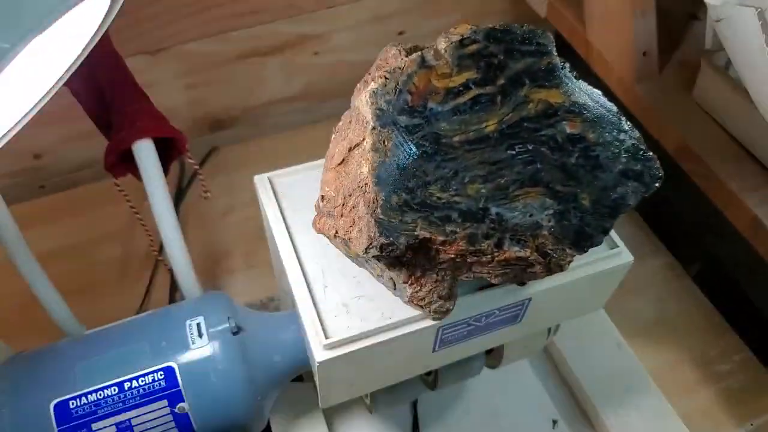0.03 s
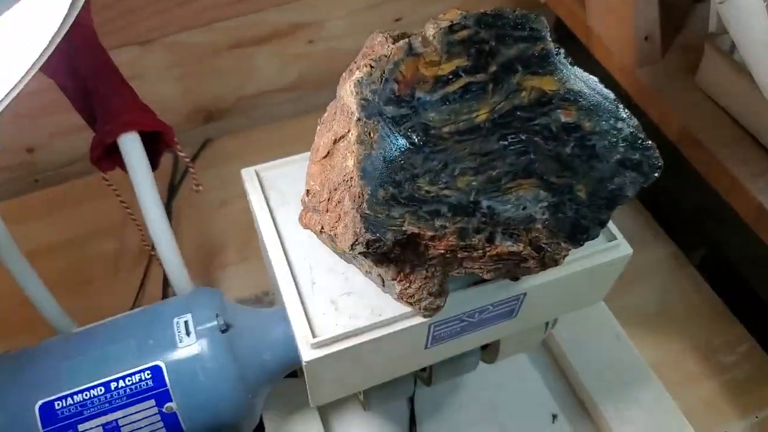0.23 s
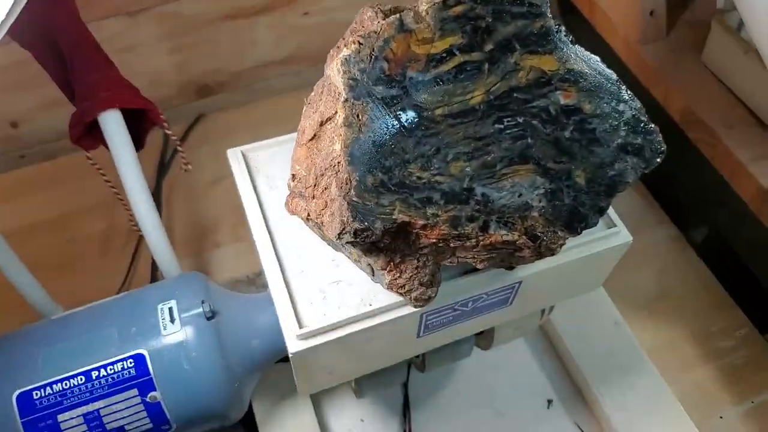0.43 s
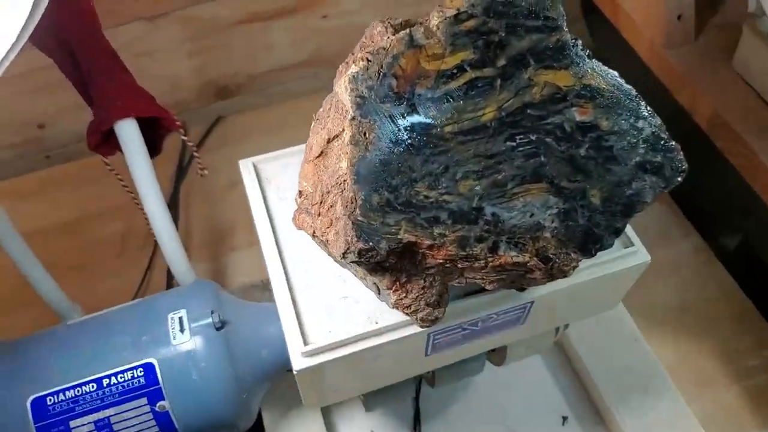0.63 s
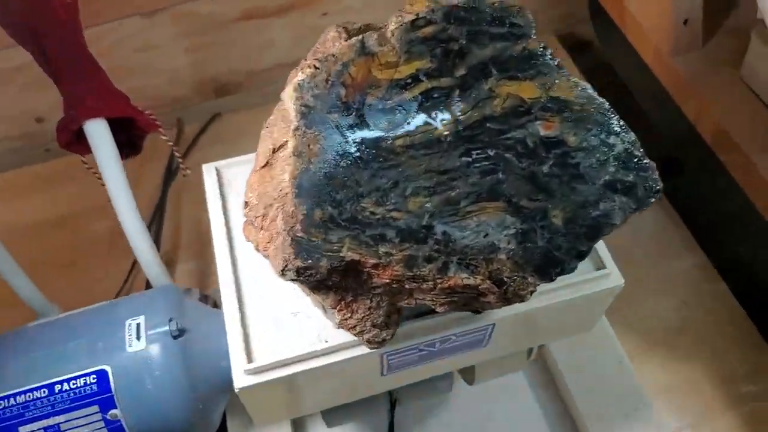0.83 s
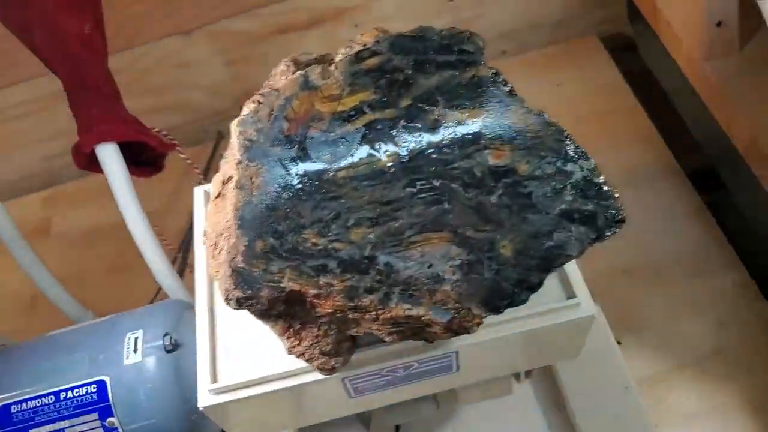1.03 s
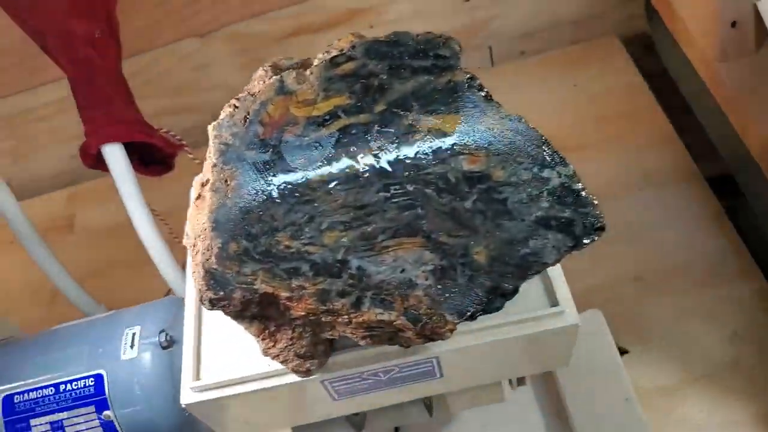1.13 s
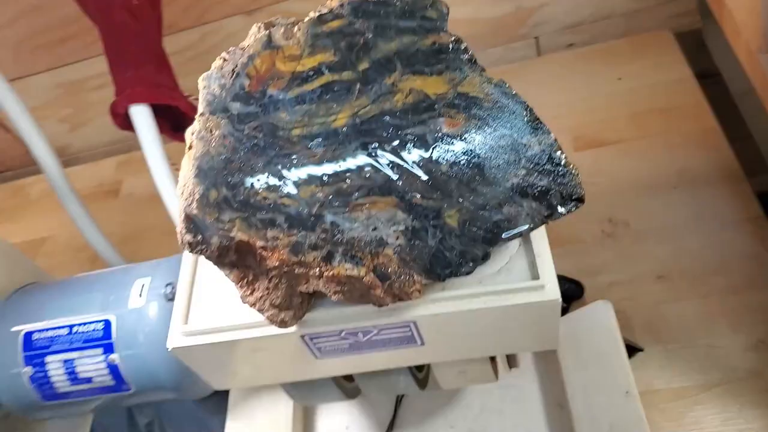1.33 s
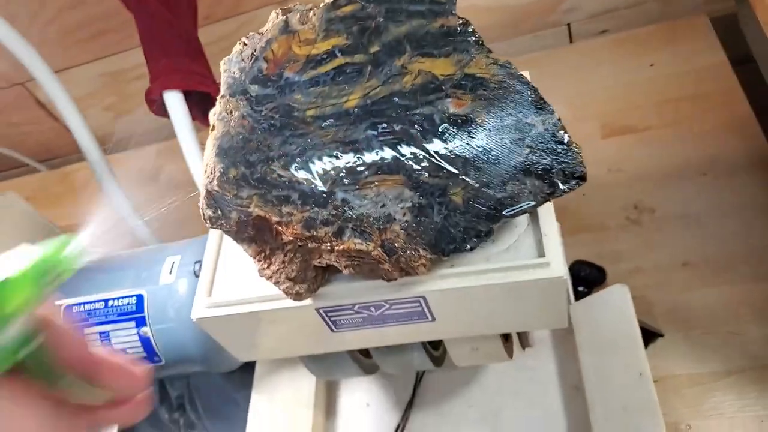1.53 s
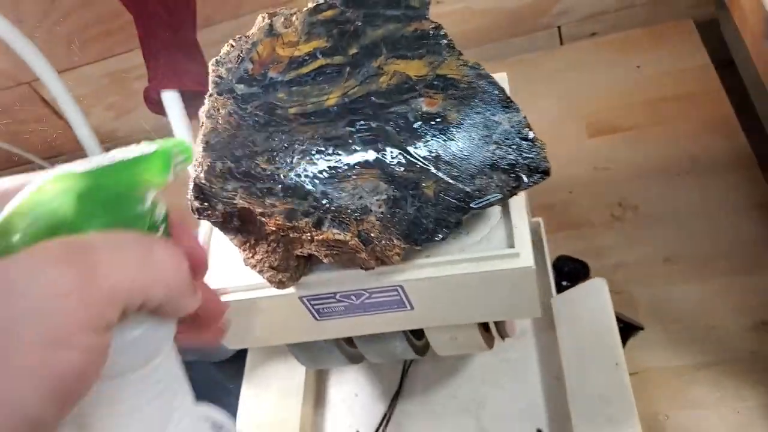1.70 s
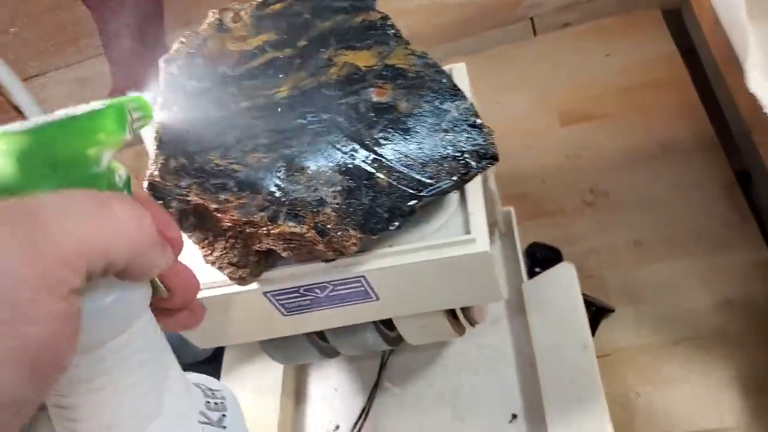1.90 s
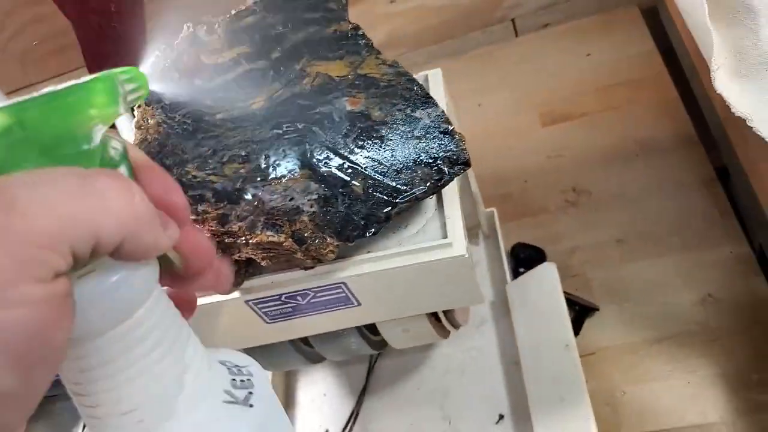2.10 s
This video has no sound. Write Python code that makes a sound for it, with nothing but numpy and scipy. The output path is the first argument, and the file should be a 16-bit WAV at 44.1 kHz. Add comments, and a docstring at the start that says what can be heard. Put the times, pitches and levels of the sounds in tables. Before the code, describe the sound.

A plastic spray bottle squirts water onto a stone slab, close by in a small workshop. Faint ticks, bumps and rustle come first, then two short hisses with trigger clicks and the start of a third.

```python
"""Spray bottle on stone

A trigger spray bottle wets a stone slab in a small workshop, close to a handheld microphone.
Faint ticks, bumps and rustle come first, as it is picked up; then three squirts, the last just beginning.
In each the nozzle hisses and mist patters on the stone; between them the trigger springs back
and the pump refills. Mains hum and room air lie below."""
import sys
import numpy as np
from scipy import signal
from scipy.fft import rfft, irfft
from scipy.io import wavfile

SR = 44100
rng = np.random.default_rng(int(sys.argv[2]) if len(sys.argv) > 2 else 0)


def generate_wav(sig):
    """Save sig (samples, or channels by samples) to the path in sys.argv[1] as 16-bit PCM at SR."""
    pcm = np.round(np.clip(np.atleast_2d(sig).T, -1, 1) * 32767).astype(np.int16)
    wavfile.write(sys.argv[1], SR, pcm)


N = 94991
T = np.arange(N) / SR
FREQS = np.maximum(np.fft.rfftfreq(N, 1 / SR), 1)


def undb(db):
    """Decibels to gain."""
    return 10 ** (np.asarray(db) / 20)


def unit_rms(x):
    """Scale to rms 1."""
    return x / np.sqrt(np.mean(x ** 2) + 1e-20)


def noise():
    """White noise."""
    return rng.standard_normal(N)


def wander(rate_hz):
    """Smooth random drift, spread near 1."""
    knots = rng.standard_normal(4096)
    return 1.46 * np.interp(T * rate_hz, np.arange(4096), knots)


def colour(x, spectrum, tilt_db_per_oct=0, modes=()):
    """Shape a steady signal by a spectrum, a tilt and resonances; rms 1."""
    hz, db = np.array(spectrum).T
    octaves = np.log2(np.clip(FREQS, hz[0], hz[-1]) / 1000)
    gain = undb(np.interp(np.log(FREQS), np.log(hz), db) + tilt_db_per_oct * octaves)
    peaks = sum(undb(level) / (1 + (2 * (FREQS - centre) / width) ** 2) for centre, width, level in modes)
    low_cut = 1 / np.sqrt(1 + (hz[0] / 2 / FREQS) ** 4)
    return unit_rms(irfft(rfft(x) * gain * (1 + peaks) * low_cut, N))


def grains(per_s, spread_db):
    """Dense tiny impacts, a few larger than the rest."""
    impulses = (rng.random(N) < per_s / SR) * np.sign(noise())
    return impulses * undb(spread_db * np.minimum(rng.exponential(size=N), 4))


def envelope(start_s, attack_s, hold_s, release_s):
    """Linear rise; exponential fall from hold_s after the start."""
    rise = np.clip((T - start_s) / attack_s, 0, 1)
    return rise * np.exp(-np.maximum(T - start_s - hold_s, 0) / release_s)


def swells(table):
    """One half-sine rise and fall per row."""
    return sum(undb(db) * np.sin(np.pi * np.clip((T - start) / length, 0, 1))
               for start, length, db in table)


def contacts(table, spectrum, attack_s, modes=()):
    """Short contacts, each exciting a dense, quickly dying ring."""
    return sum(undb(db) * envelope(start, attack_s, attack_s, decay) * colour(noise(), spectrum, tilt, modes)
               for start, db, decay, tilt in table)


# hum partials (frequency [Hz], level [dB])
HUM_PARTIALS = [(58.5, -60), (120, -69.5), (570, -79)]


def mains_hum(waver_db=-1.5):
    """Three low tones, each wavering in level."""
    return sum(undb(db + waver_db * wander(8.2)) * np.sqrt(2) * np.sin(2 * np.pi * (hz * T + rng.random()))
               for hz, db in HUM_PARTIALS)


# spectrum of room air plus handling rustle (frequency [Hz], gain [dB])
AIR_RUSTLE_SPECTRUM = [(25, -22), (55, -11.5), (110, -6), (200, -18.5), (500, -14), (1000, -21.5),
                       (2500, -17), (6000, -22.5), (15500, -30)]
# room air plus handling rustle (time [s], level [dB])
AIR_RUSTLE_LEVELS = [(.3, -67), (.93, -66), (1.25, -59), (1.6, -55), (2.15, -56)]


def air_and_rustle():
    """Steady room air plus handling rustle that grows as the bottle is picked up."""
    mid, side = colour(noise(), AIR_RUSTLE_SPECTRUM), colour(noise(), AIR_RUSTLE_SPECTRUM)
    side = irfft(rfft(side) * np.clip(FREQS / 900, .3, 1), N)  # bass alike in both channels
    gain = undb(np.interp(T, *np.array(AIR_RUSTLE_LEVELS).T))
    return gain * np.array([mid + side, mid - side])


# bumps of hand and bottle (time [s], level [dB], decay [s], tilt [dB/octave])
BUMPS = [(.150, -49.5, 0.04, -1), (1.283, -50, 0.0074, -1), (1.299, -40, 0.037, -2),
         (1.782, -47, 0.026, -9), (1.884, -42.5, 0.032, -6.5), (2.062, -41, 0.019, -1.5),
         (2.128, -40.5, 0.023, -1.5)]
# bump spectrum (frequency [Hz], gain [dB])
BUMP_SPECTRUM = [(30, -17.5), (70, -1), (110, -6.5), (165, -3), (250, -1), (400, -12.5), (800, -6),
                 (1500, -11), (5000, -58)]


def hand_bumps():
    """Hand and bottle bump dully."""
    return contacts(BUMPS, BUMP_SPECTRUM, attack_s=.005)


# taps at the bench (time [s], level [dB], decay [s], tilt [dB/octave])
TICKS = [(.208, -40, 0.00067, 1.5), (.457, -52.5, 0.0029, 0.5), (.546, -40.5, 0.0069, 2),
         (.638, -58.5, 0.0063, -13), (.791, -46, 0.015, -0.5), (.977, -42.5, 0.0068, -1.5),
         (1.004, -48.5, 0.006, 0.5), (1.150, -26, 0.0011, 0), (1.258, -40, 0.0036, 1.5),
         (1.268, -46, 0.0036, 3), (1.294, -36.5, .004, -2.5), (1.318, -60, 0.0046, -12),
         (1.466, -50, 0.012, 5.5)]
# tap spectrum (frequency [Hz], gain [dB])
TICK_SPECTRUM = [(200, -22), (600, -22.5), (1100, -10), (1700, 3), (2700, -4.5), (4500, -7.5), (6500, -12),
                 (9000, -13), (15500, -21)]
# tap resonances (frequency [Hz], width [Hz], gain [dB])
TICK_MODES = [(1747, 110, -18), (2720, 170, 0), (3430, 90, 7), (6290, 180, 8)]


def bench_ticks():
    """Light taps ring briefly at the bench."""
    return contacts(TICKS, TICK_SPECTRUM, attack_s=.00074, modes=TICK_MODES)


# slides on the bench (time [s], length [s], level [dB])
SLIDES = [(0.421, 0.12, -59), (0.783, .1, -61.5), (0.981, 0.16, -63), (1.09, 0.21, -68.5),
          (1.22, 0.28, -56.5)]
# friction spectrum (frequency [Hz], gain [dB])
SLIDE_SPECTRUM = [(200, -1), (600, -8), (1000, -11.5), (1600, -4.5), (3000, 3.5), (6500, -6.5),
                  (10000, -23), (15500, -15)]


def bench_slides():
    """Things scrape softly across the bench."""
    return swells(SLIDES) * colour(noise(), SLIDE_SPECTRUM)


# trigger squeezes (time [s], length [s], jet level [dB], mist level [dB])
SQUIRTS = [(1.6, 0.12, -31, -31.5), (1.862, .11, -28.5, -29), (2.111, .115, -28.5, -25.5)]
# nozzle hiss spectrum (frequency [Hz], gain [dB])
JET_SPECTRUM = [(150, -13), (500, -12), (1200, -4.5), (2500, -6.5), (5000, -3), (8000, -5), (11000, -5),
                (15500, -2)]


def nozzle_jet(sag_db_per_s=63, flutter_db=1.7):
    """The nozzle hisses at once, sags with the pressure and shuts."""
    flow = np.zeros(N)
    for start, length, db, _ in SQUIRTS:
        sag_db = sag_db_per_s * np.clip(T - start, 0, length)
        flow += undb(db - sag_db) * envelope(start, attack_s=.0037, hold_s=length, release_s=.021)
    return flow * undb(flutter_db * wander(350)) * colour(noise(), JET_SPECTRUM)


# spectrum of mist on stone (frequency [Hz], gain [dB])
MIST_SPECTRUM = [(200, -18), (700, -10), (1300, -2), (2200, -1), (3200, 1), (4800, -1), (8000, -4.5),
                 (15500, -14.5)]
# narrow spray resonances (frequency [Hz], width [Hz], gain [dB])
SPRAY_MODES = [(2840, 33, 5), (3204, 78, 2), (3700, 50, 0), (4300, 46, -1), (4920, 24, -21)]


def mist(delay_s=.0021):
    """Droplets patter on the stone, building as the cone of spray fills."""
    flow = sum(undb(db) * envelope(start + delay_s, attack_s=.046, hold_s=length, release_s=.033)
               for start, length, _, db in SQUIRTS)
    droplets = grains(per_s=16000, spread_db=1.5)
    return flow * colour(droplets, MIST_SPECTRUM, modes=SPRAY_MODES)


# trigger clicks (time [s], level [dB], decay [s], tilt [dB/octave])
CLICKS = [(1.604, -44, 0.0011, 9), (1.625, -26, 0.0011, 1.5), (1.794, -36.5, 0.0031, -0.5),
          (1.834, -32.5, 0.0061, -3.5), (1.841, -33.5, 0.0097, -3), (1.859, -26.5, 0.0033, 4.5),
          (1.869, -25, 0.0057, 1.5), (1.8825, -25, 0.00089, -5), (1.898, -39.5, 0.0039, -3.5),
          (2.029, -31.5, 0.0014, 0), (2.041, -30, 0.0015, -0.5), (2.0675, -26, .005, -4),
          (2.091, -27.5, 0.0017, 8), (2.115, -24.5, .002, 3), (2.121, -18, 0.00088, 5),
          (2.132, -26.5, .002, -1)]
# plastic click spectrum (frequency [Hz], gain [dB])
PLASTIC_SPECTRUM = [(200, -24.5), (700, -5.5), (2100, 2), (4000, -3), (7500, 1.5), (11000, -1.5),
                    (15500, -5.5)]


def trigger_clicks():
    """The plastic trigger clicks as it is squeezed and springs back."""
    return contacts(CLICKS, PLASTIC_SPECTRUM, attack_s=.00053)


# return strokes (time [s], length [s], level [dB])
REFILLS = [(1.773, 0.064, -39), (2.038, 0.058, -33.5)]
# suction spectrum (frequency [Hz], gain [dB])
REFILL_SPECTRUM = [(150, -9), (500, -8.5), (1300, 4.5), (2200, -2.5), (3500, 2), (6000, -8), (15500, -22.5)]


def pump_refill():
    """The piston sucks water up on its way back."""
    return swells(REFILLS) * colour(grains(per_s=3500, spread_db=2.5), REFILL_SPECTRUM)


# workshop reverberation (frequency [Hz], T60 [s])
ROOM_T60 = [(150, 0.12), (1000, 0.51), (3000, 0.35), (8000, .3), (15000, 0.15)]


def room_tail(onset_s=.008):
    """Diffuse response of the workshop; the midrange lasts longest."""
    hz, t60s = np.array(ROOM_T60).T
    source = rfft(noise())
    bands = (irfft(source * np.interp(np.log(FREQS), np.log(hz), row), N) for row in np.eye(len(hz)))
    tail = sum(band * undb(-60 * T / t60) for band, t60 in zip(bands, t60s))
    return unit_rms(tail * np.clip(T / onset_s, 0, 1)) / np.sqrt(N)


def place(x, pan_db, early_db, room_db):
    """Direct sound in two channels, reflections off the bench, then the room."""
    channels = []
    for side, lag_s in ((1, 0), (-1, .00043)):
        early = np.diff(noise(), prepend=0) * envelope(.001, attack_s=.001, hold_s=0, release_s=.0032)
        early = unit_rms(early) / np.sqrt(N)
        near = x + undb(early_db) * signal.fftconvolve(x, early)[:N]
        near = np.roll(near, int(lag_s * SR)) * (T >= lag_s)
        room = undb(room_db) * signal.fftconvolve(x, room_tail())[:N]
        channels.append(undb(side * pan_db / 2) * (near + room))
    return np.array(channels)


def scene():
    """Stereo mix; the mist lands widely, so each channel gets different droplets."""
    return (mains_hum() + air_and_rustle()
            + place(hand_bumps(), pan_db=1, early_db=-14, room_db=-17)
            + place(bench_ticks() + bench_slides(), pan_db=-4.5, early_db=.5, room_db=0)
            + place(nozzle_jet() + trigger_clicks() + pump_refill(), pan_db=4, early_db=-2, room_db=-9.5)
            + np.array([mist(), mist()]))


def record(dry):
    """A steep low-pass cuts the top treble."""
    cutoff_hz = 16100
    return signal.sosfilt(signal.ellip(10, .2, 75, cutoff_hz, fs=SR, output="sos"), dry)


dry = scene()
out = record(dry)
generate_wav(out)
```